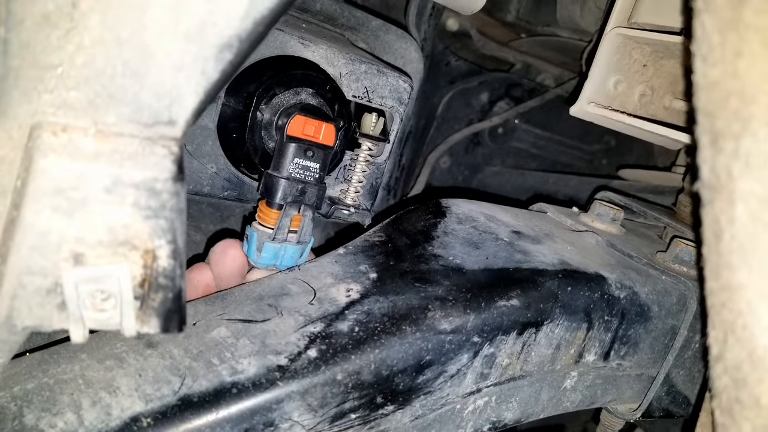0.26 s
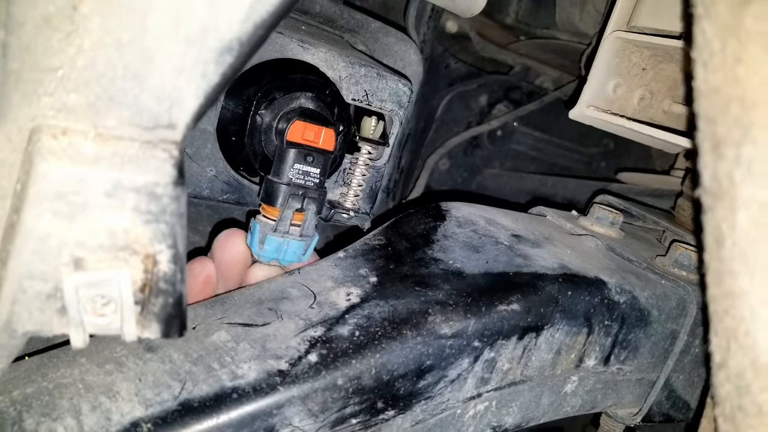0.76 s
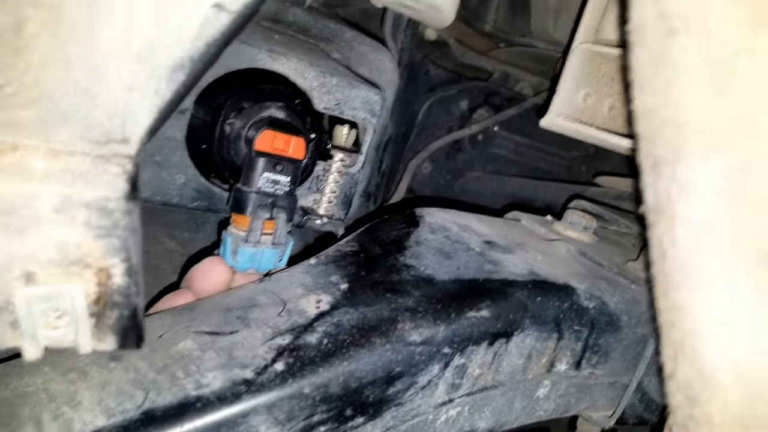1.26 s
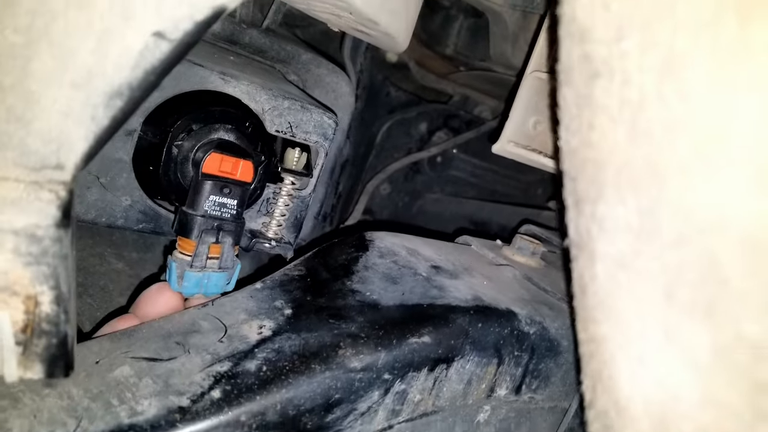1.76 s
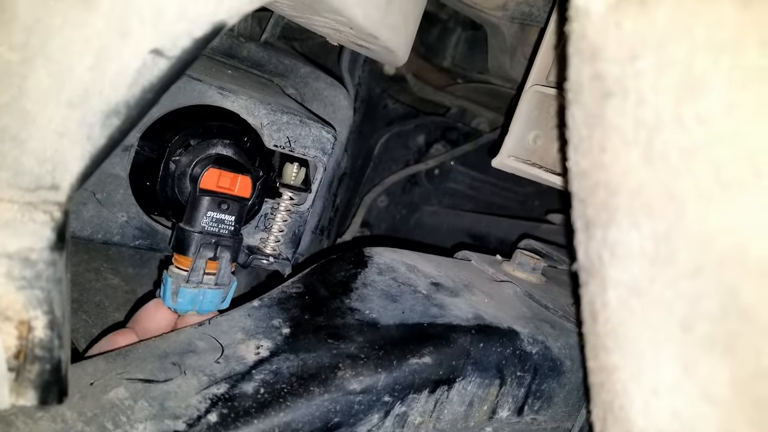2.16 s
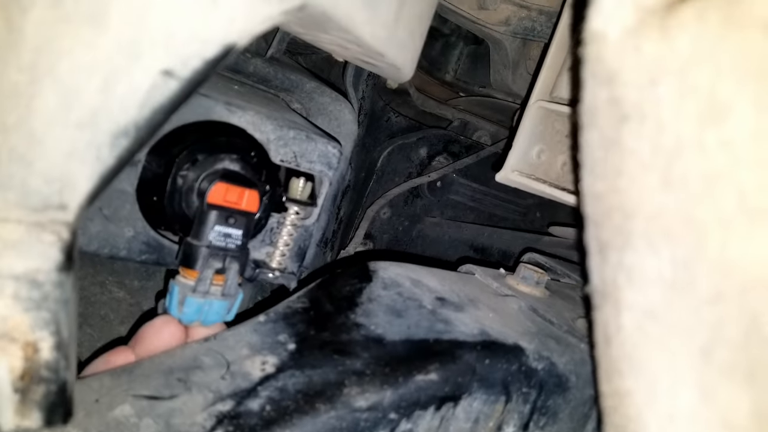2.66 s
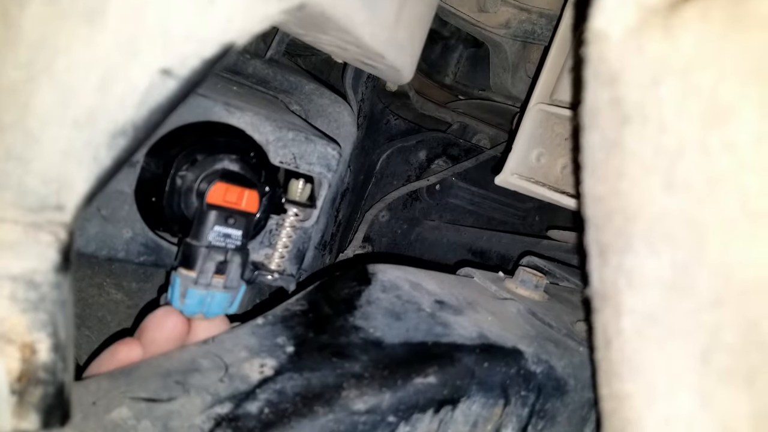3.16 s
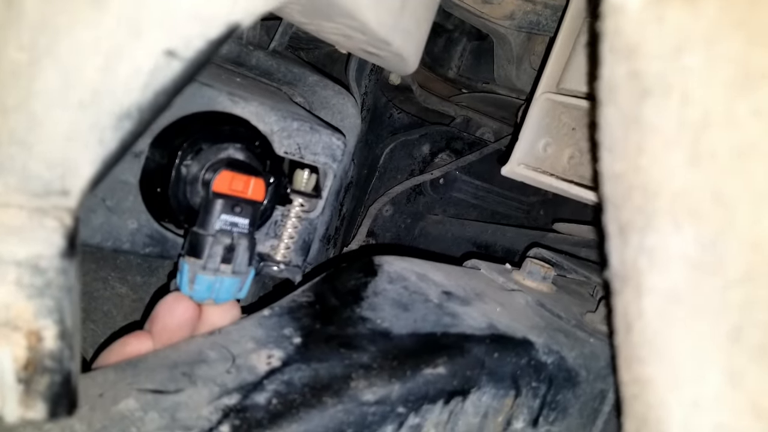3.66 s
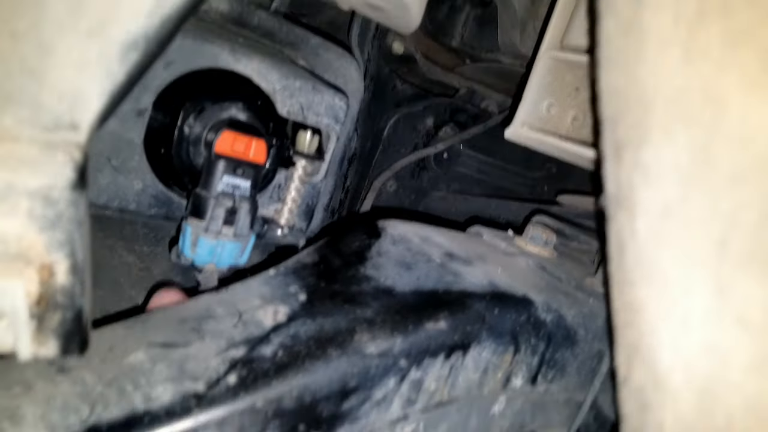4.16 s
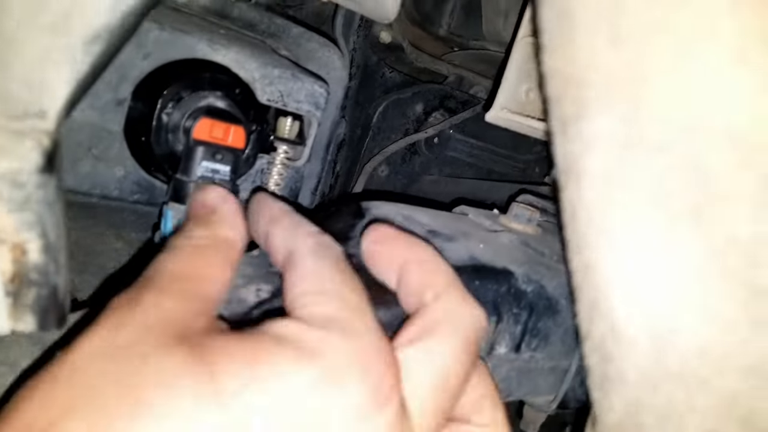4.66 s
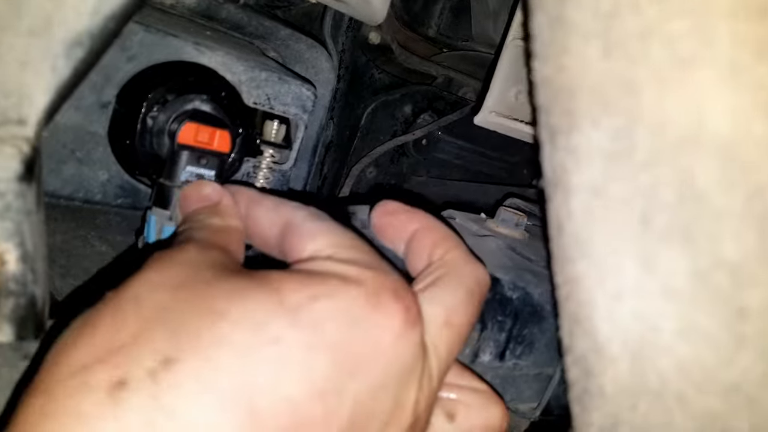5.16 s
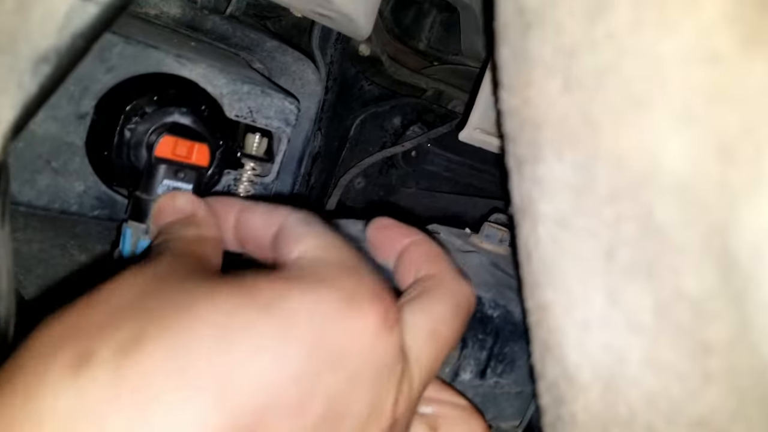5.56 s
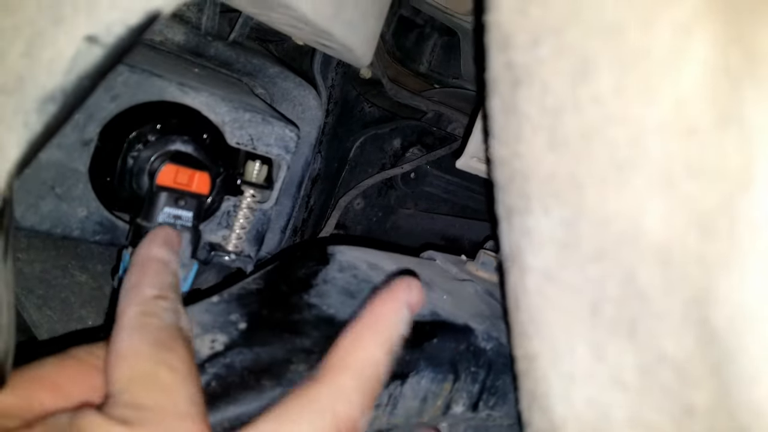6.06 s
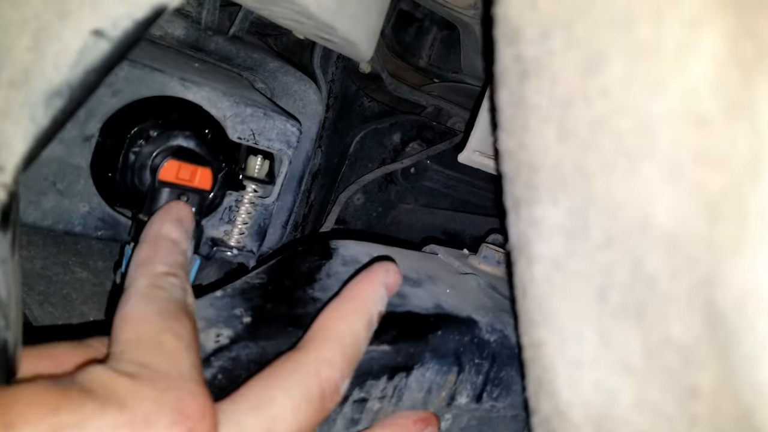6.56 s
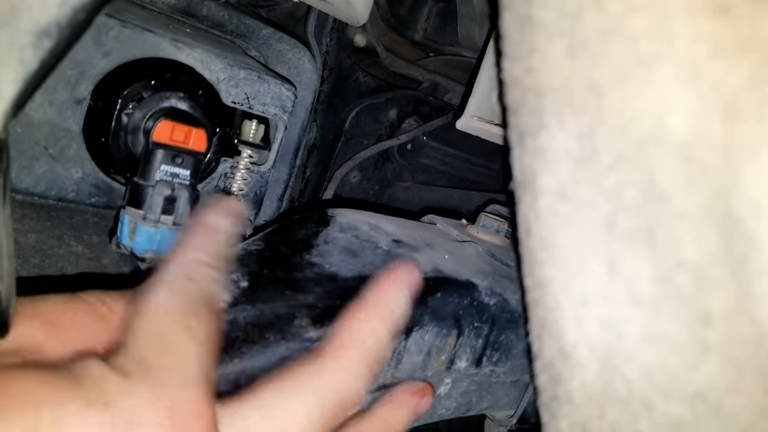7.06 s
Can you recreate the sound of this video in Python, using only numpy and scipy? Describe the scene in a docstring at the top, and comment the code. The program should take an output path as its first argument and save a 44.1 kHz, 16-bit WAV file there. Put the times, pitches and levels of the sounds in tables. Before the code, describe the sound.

Very close under a vehicle, a plastic plug clacks hard onto a hollow lamp almost at once, with a sharp latch snap, a panel thud and a thin spring ring. Light rubs and ticks follow, then a second drier double knock midway. Later, clicks, dull fingertip bumps on the right of the microphone, tiny squeaks and weaker knocks over low rumble and faint hiss.

```python
"""Under a vehicle, close to the microphone, a hand works a plastic wiring connector onto a lamp bulb.
Knocks ring damped modes of the hollow lamp, bracket and panel; hard snaps add noise cracks and a singing spring.
The latch ticks in noise bursts; sliding fingers and plug scrape and squeak by random slips through resonances.
A finger bumps the right microphone port with slow pressure pulses and brushes it with skin noise.
Underneath lie rumble and hiss of shaped noise, wavering sine hums and a thin whine from a narrow noise band."""
import sys
import numpy as np
from scipy import signal
from scipy.fft import rfft, irfft, next_fast_len
from scipy.io import wavfile
from scipy.ndimage import map_coordinates

SR = 44100
rng = np.random.default_rng(int(sys.argv[2]) if len(sys.argv) > 2 else 0)


def wrap_up_sound(samples):
    """Save the sound to the file named by the first command line argument, as 16-bit audio."""
    columns = np.atleast_2d(samples).T
    # keep every value between -1 and 1, then stretch to whole-number steps
    tamed = np.clip(columns, -1, 1)
    steps = np.round(tamed * 32767).astype(np.int16)
    wavfile.write(sys.argv[1], SR, steps)


N = 322371
T = np.arange(int(.7 * SR)) / SR  # time axis of one struck sound [s]
# All table levels are relative: part trims, panning and the port colour come on top.


# the plug strikes the lamp: (time [s], housing level [dB], bracket level [dB], panel level [dB])
PLUG_KNOCKS = [(0.466, -5, -30, -33), (.475, 1, -16.5, -15), (.4883, -19.5, -20.5, -12.5),
               (2.314, -26, -31.5, -39), (3.4932, 0, -36.5, -39), (3.502, -0.5, -24, -38),
               (5.053, -41.5, -39, -60), (5.067, -35, -38.5, -46), (5.367, -55, -64, -39),
               (5.645, -40.5, -52, -65), (6.206, -29, -49, -45.5), (6.271, -39, -60, -58),
               (6.7322, -20.5, -35, -36.5), (6.7399, -21.5, -29.5, -28.5), (6.8165, -40, -61, -32),
               (7.079, -41, -70, -66)]
# modes of the hollow lamp housing: (frequency [Hz], level [dB], t60 [s])
HOUSING_MODES = [(1194, -5, 0.035), (1371.5, 3, 0.032), (1481, -8, .04), (1579, -7, 0.053),
                 (1892, -12.5, 0.039), (2093, -13, 0.046), (2490, -26.5, 0.14), (3320, -29, 0.026),
                 (3940, -31.5, 0.027)]
# modes of the lamp bracket: (frequency [Hz], level [dB], t60 [s])
BRACKET_MODES = [(729, -12.5, .09), (852.8, -1.5, 0.12), (926, -8.5, 0.036), (1067, -8, 0.064)]
# modes of the body panel: (frequency [Hz], level [dB], t60 [s])
PANEL_MODES = [(121, -14.5, 0.13), (151.4, -6, 0.31), (240, -6.5, 0.2), (277, -9.5, 0.15),
               (321.4, 0.5, .17), (355.6, -6, 0.13), (455, -9.5, 0.081), (481, -6, 0.25), (590, -9, 0.088)]
# colour of the housing's dense noise: (frequency [Hz], level [dB])
CLACK_COLOUR = [(300, -26), (800, -18), (1350, 8), (2100, -9), (2800, -18.5), (4200, -17.5), (7000, -32),
                (9000, -46), (16000, -50)]
# colour of the panel's dense noise: (frequency [Hz], level [dB])
THUD_COLOUR = [(40, -26), (130, -6.5), (205, -11), (320, -2.5), (800, -11), (2000, -26), (6000, -55.5)]


def knocks():
    """Each blow rings the hollow housing, its bracket and the body panel."""
    housing, mount = np.zeros((2, N))
    for s, housing_db, bracket_db, panel_db in PLUG_KNOCKS + grips():
        clack = ring(HOUSING_MODES, attack=0.0017, scatter_db=1.5)
        clack = clack + amp(-20) * burst(CLACK_COLOUR, t60=0.096, attack=0.0012)
        bracket = ring(BRACKET_MODES, attack=0.00027, scatter_db=2)
        thud = amp(-1) * ring(PANEL_MODES, attack=.001, scatter_db=2)
        thud = thud + amp(-3) * burst(THUD_COLOUR, t60=.08, attack=0.00073)
        add(housing, s, amp(housing_db) * clack)
        add(mount, s, amp(bracket_db) * bracket + amp(panel_db) * softened(thud, panel_db))
    return placed(housing, left_db=-10.5, lag=0.00056) + placed(mount, left_db=-4.5, lag=0)


# a grip's knock over its stroke, then bracket and panel under the housing [dB]
GRIP_DB, GRIP_BRACKET_DB, GRIP_PANEL_DB = 18, -11, -14.5


def grips():
    """Each stroke starts with a light knock, in step with how hard it rubs the housing."""
    slope = PART_LEVELS[1][1]
    light = [(s, db + slope * bright_db + GRIP_DB) for s, half, db, bright_db in RUB_STROKES]
    return [(s, db, db + GRIP_BRACKET_DB, db + GRIP_PANEL_DB) for s, db in light]


SOFT_HZ, SOFT_GROWS = 1300, .3  # low-pass corner for a 0 dB blow [Hz], its power law with blow gain


def softened(x, db):
    """A weak blow stays in contact longer and thuds duller: a lower low-pass corner."""
    corner = np.clip(SOFT_HZ * amp(db) ** SOFT_GROWS, 60, 8000)
    return signal.sosfilt(signal.butter(2, corner, fs=SR, output="sos"), x)


# the latch snaps home:
# (time [s], crack level [dB], sizzle level [dB], spring level [dB], place struck along the spring [0-1])
LATCH_SNAPS = [(0.4657, -34.5, -34, -74, .45), (0.475, -14.5, -8.5, -39.5, 0.44),
               (3.4935, -25.5, -26, -61, .31), (3.4997, -26.5, -24, -43.5, 0.26)]
# colour of the latch letting go: (frequency [Hz], level [dB])
CRACK_COLOUR = [(900, -19.5), (1900, 1), (2600, 1.5), (3300, -0.5), (4500, -1.5), (7000, -13),
                (8500, -19.5), (11000, -18), (16000, -25)]
# colour of the brightest latch noise, in snaps and ticks: (frequency [Hz], level [dB])
SIZZLE_COLOUR = [(5000, -39.5), (9000, -20.5), (10500, -9.5), (12000, -1), (14000, -0.5), (15500, -1),
                 (16800, -27)]
# modes of the steel spring: (frequency [Hz], level [dB], t60 [s])
SPRING_MODES = [(1137, 5, .64), (1740, -11.5, 0.93), (2120, -14.5, 0.99), (2920, -11, 0.38),
                (3480, -26.5, 0.32), (4250, -19.5, 0.43)]
# each spring mode radiates its own way: (frequency [Hz], left minus right [dB])
SPRING_PAN_BANDS = [(1150, 3.5), (1750, 3), (2150, -13.5), (2850, -6.5), (3500, 5.5), (4250, -4)]


def snaps():
    """The stiff latch lets go with a crack and a short sizzle; the spring sings until the hand damps it."""
    latch, spring = np.zeros((2, N))
    damping = amp(-110 * np.maximum(T - .23, 0))  # 110 dB a second, from 0.23 s after the snap
    for s, crack_db, sizzle_db, spring_db, place in LATCH_SNAPS:
        crack = burst(CRACK_COLOUR, t60=0.031, attack=0.00052)
        sizzle = burst(SIZZLE_COLOUR, t60=0.014, attack=.0002)
        add(latch, s, amp(crack_db) * crack + amp(sizzle_db) * sizzle)
        modes = []
        for k, (hz, db, t60) in enumerate(SPRING_MODES):
            # a mode answers weakly when struck near one of its nodes
            answer = np.sin((k + 1) * np.pi * place) ** 2
            modes.append((hz, db + 10 * np.log10(answer + 1e-6), t60))
        add(spring, s, amp(spring_db) * damping * ring(modes, attack=.004, scatter_db=1))
    return placed(latch, left_db=-11.5, lag=0) + amp(-2.5) * panned_by_band(spring, SPRING_PAN_BANDS)


# the latch catches on its ribs: (time [s], sizzle level [dB], latch level [dB])
LATCH_TICKS = [(1.6868, -35, -49.5), (2.0234, -53, -50.5), (2.3143, -39.5, -37.5), (2.7279, -47, -55),
               (3.3388, -57, -58.5), (3.3892, -38.5, -36.5), (3.498, -41.5, -29.5), (4.1525, -42.5, -41),
               (4.1641, -34, -39.5), (4.2009, -38, -45), (4.2413, -38.5, -43), (5.067, -70, -57.5),
               (6.2008, -46.5, -59.5), (6.7336, -44, -49.5)]
# colour of the latch body's click: (frequency [Hz], level [dB])
LATCH_COLOUR = [(1500, -20.5), (3000, -11), (4200, -4.5), (6000, 2.5), (7500, 3.5), (9000, -12.5),
                (16000, -19.5)]


def ticks():
    """Small bright clicks of the latch: noise bursts drawn separately for each port."""
    out = np.zeros((2, N))
    for s, sizzle_db, latch_db in LATCH_TICKS:
        pair = []
        for port in out:
            sizzle = burst(SIZZLE_COLOUR, t60=.028, attack=0.00028)
            click = burst(LATCH_COLOUR, t60=0.041, attack=0.00035)
            pair.append(amp(sizzle_db) * sizzle + amp(latch_db) * click)
        add(out, s, np.array(pair))
    return panned(out, pan_db=-5)


# how a stroke sounds the body, housing, shell and skin, one row each:
# (level [dB], level slope [dB per dB of brightness])
PART_LEVELS = [(6.5, -1.03), (4, -0.48), (1, 0.5), (3.5, 1.93)]
# the hand leans on the plug and is never quite still: (time [s], rustle level [dB])
HAND_HOLD = [(0, -94), (.6, -82), (1.3, -79), (1.8, -89.5), (3.9, -92.5), (4.3, -81.5), (5.4, -89.5),
             (6.5, -89.5), (6.9, -76), (7.31, -76)]
# low resonances of the rubbed body: (frequency [Hz], level [dB], t60 [s])
BODY_MODES = [(338, -3.5, 0.078), (470, -4.5, 0.065), (608, -1.5, 0.037), (700, -5, 0.046),
              (840, -2.5, 0.025)]
# resonances of the thin plug shell: (frequency [Hz], level [dB], t60 [s])
SHELL_MODES = [(2293, -8, .04), (2650, -7.5, 0.017), (3140, 0, 0.0064), (3770, -2.5, 0.009),
               (4213, -5, 0.018), (4950, -3, 0.0059), (6600, 3.5, 0.0039)]
# colour of sliding skin: (frequency [Hz], level [dB])
SKIN_COLOUR = [(3000, -21), (6500, 0), (8500, -16), (11000, -3), (13500, 1), (15600, 0.5), (16300, -27)]


def rubbing():
    """Each slide swells and fades, sounding the body, the housing, the thin plug shell and the skin."""
    part_db, slope = np.transpose(PART_LEVELS)
    contacts = slides()
    strengths = np.array([amp(db + slope * bright_db) for s, half, db, bright_db in contacts])
    shapes = np.array([swell(s, half) for s, half, db, bright_db in contacts])
    rustle = amp(curves(HAND_HOLD)[0])
    # overlapping slides and the rustle add as powers
    gains = np.sqrt(strengths.T ** 2 @ shapes ** 2 + rustle ** 2)
    body, housing, rasp, fizz = amp(part_db)[:, None] * gains
    low = body * panned(rubbed(BODY_MODES), pan_db=-3.5)
    low = low + housing * panned(rubbed(HOUSING_MODES), pan_db=-9.5)
    high = rasp * panned(rubbed(SHELL_MODES), pan_db=-6.5)
    high = high + fizz * panned(coloured(slips(), SKIN_COLOUR), pan_db=-4)
    return low + high


# fingers and plug slide, brighter with skin, duller with plastic:
# (time of the first grip [s], half length [s], level [dB], brightness [dB])
RUB_STROKES = [(.05, 0.064, -78.5, -6), (0.399, 0.046, -79.5, -10), (0.798, .035, -65, 1.5),
               (0.928, 0.04, -66, 1), (1.04, 0.084, -69, -3), (1.188, 0.084, -72, -6),
               (1.683, 0.027, -69, -7.5), (1.987, .06, -72, -4), (2.721, 0.06, -66.5, -8),
               (3.345, 0.053, -67.5, 1), (3.782, 0.019, -72, -0.5), (4.157, .042, -57, -2),
               (4.218, 0.063, -66, 4), (4.745, 0.12, -81.5, -15.5), (5.151, 0.031, -70, -3.5),
               (5.665, 0.052, -73.5, 3), (5.873, 0.12, -66.5, 1), (6.658, .04, -70.5, -0.5),
               (7.115, 0.08, -62, 1)]
GRIP_LEAD = .4  # a stroke peaks this share of its half length after the grip
SKID_S, SKID_HALF_S, SKID_BRIGHT_DB = 0.046, 0.045, -4.5  # delay to the peak, half length, brightness
SKID_DB, SKID_MAX_DB = -41.5, -66.5  # the skid under its knock; friction caps its level


def slides():
    """Sliding contacts (peak time, half length, level, brightness): strokes, and a skid after each knock."""
    strokes = [(s + GRIP_LEAD * half, half, db, bright_db) for s, half, db, bright_db in RUB_STROKES]
    skids = []
    for s, housing_db, *rest in PLUG_KNOCKS:
        skid_db = min(housing_db + SKID_DB, SKID_MAX_DB)
        skids.append((s + SKID_S, SKID_HALF_S, skid_db, SKID_BRIGHT_DB))
    return strokes + skids


def slips():
    """Sliding friction at each port: countless tiny slips of uneven size, coming in clumps."""
    return rng.standard_normal((2, N)) * amp(2.4 * wobble(800) + 3 * wobble(70))


def rubbed(modes):
    """Slips played through an object's resonances, at rms 1."""
    resonance = ring(modes, attack=.0001, scatter_db=2)
    return unit(signal.fftconvolve(slips(), resonance[None], axes=1)[:, :N])


# a fingertip sticks and squeaks on the shell: (time of the peak [s], half length [s], level [dB])
FINGER_SQUEAKS = [(4.802, 0.021, -55.5), (5.895, 0.024, -50)]
# ringing resonances of the squeak: (frequency [Hz], level [dB], t60 [s])
SQUEAK_MODES = [(2313, 5, 0.068), (2730, -12, 0.05), (3810, -3, 0.026), (4260, 1.5, 0.041)]


def squeaks():
    """Sticking skin rasps on the shell and sets its sharpest resonances singing."""
    sound = rubbed(SQUEAK_MODES) + amp(-2) * rubbed(SHELL_MODES)
    gain = sum(amp(db) * swell(s, half) for s, half, db in FINGER_SQUEAKS)
    return gain * panned(unit(sound), pan_db=-5.5)


# the cavity's decay: (frequency [Hz], t60 [s])
WHEEL_WELL_DECAY = [(150, .19), (800, 0.24), (1500, 0.091), (4000, 0.074), (14000, .08)]


def wheel_well(x):
    """The cavity's short answer: a noise tail decaying by band, longest in the low mids, short above."""
    hz, t, z = signal.stft(rng.standard_normal((2, SR // 2)), SR, nperseg=256)
    decay = amp(-60 * t / along(WHEEL_WELL_DECAY, hz)[:, None])
    tail = signal.istft(z * decay, SR, nperseg=256)[1]
    return signal.fftconvolve(x, tail / np.linalg.norm(tail[0]), axes=1)[:, :N]


# a finger bumps the right port: (time [s], level [dB], contact time to the pressure peak [s])
PORT_BUMPS = [(4.5020, -8, .0007), (4.507, -8, 0.0022), (4.5419, -16, 0.00044), (4.643, -24, 0.0013)]


def bumps():
    """A fingertip pushes air into the port; the pressure leaks away and undershoots."""
    out = np.zeros(N)
    for s, db, contact in PORT_BUMPS:
        u = T / contact
        add(out, s, amp(db) * u ** 2 * np.exp(2 * (1 - u)))
    leak = signal.butter(3, 50, "high", fs=SR, output="sos")
    return signal.sosfilt(leak, out) * amp([[-26], [2]])  # left, right


# half length [s], level for a 0 dB bump [dB], growth [dB per dB of bump]
BRUSH_HALF_S, BRUSH_DB, BRUSH_GROWS = 0.014, -62.5, 0.11
# the fingertip judders as it lands: delay [s], half length [s], level under the bump [dB]
GRIT_DELAY_S, GRIT_HALF_S, GRIT_DB = 0.0042, 0.0086, -34


def brushes():
    """Every bump drags a little skin across the right port: a gritty judder and a soft hiss."""
    grit, brush = np.zeros((2, N))
    for s, db, contact in PORT_BUMPS:
        grit += amp(db + GRIT_DB) * swell(s + GRIT_DELAY_S, GRIT_HALF_S)
        brush += amp(BRUSH_DB + BRUSH_GROWS * db) * swell(s, BRUSH_HALF_S)
    judder = grit * rubbed(BODY_MODES)
    skin = rubbed(SHELL_MODES) + amp(2.5) * coloured(slips(), SKIN_COLOUR)
    return panned(judder, pan_db=-21.5) + brush * panned(skin, pan_db=-13)


# faint low hums, like distant motors:
# (time at the loudest [s], half length [s], mean frequency [Hz], mean level [dB])
LOW_HUMS = [(0.802, 1.17, 220, -62), (2.918, .42, 199, -53.5), (5.202, 0.94, 156, -55.5)]


def drone():
    """Sine hums that swell and fade, wavering in pitch and level."""
    out = np.zeros(N)
    for s, half, hz, db in LOW_HUMS:
        level = amp(db + 2.5 * wobble(6)) * swell(s, half)
        phase = 2 * np.pi * np.cumsum(hz + 0.4 * wobble(7)) / SR
        out += level * np.sin(phase)
    return out


# colour of the garage rumble: (frequency [Hz], level [dB])
RUMBLE_COLOUR = [(18, -42), (30, -11.5), (55, 2), (120, 0), (200, -4.5), (290, -11), (400, -22.5),
                 (700, -37.5), (1000, -38.5), (1350, -41), (2000, -47), (5000, -54.5), (9000, -66.5)]
# how the rumble rises and falls: (time [s], level [dB])
RUMBLE_LEVEL = [(0.0, -49), (0.47, -49), (0.85, -52.5), (2.42, -56.5), (3.18, -50), (3.58, -54), (6.6, -54),
                (7.31, -51)]
# colour of the microphone's whine, a narrow band: (frequency [Hz], level [dB])
WHINE_COLOUR = [(5600, -42.5), (6400, -12), (6950, 0), (7250, 1.5), (7500, -13), (7900, -39.5)]
# colour of the microphone's hiss: (frequency [Hz], level [dB])
HISS_COLOUR = [(7000, -36.5), (10000, -13.5), (12500, -1), (15500, 3), (16200, -24.5)]


def background():
    """Low garage rumble, nearly alike in both ports, and hums under the microphone's whine and hiss."""
    noise = lambda: rng.standard_normal((2, N))
    shared = rng.standard_normal(N)
    rumble = coloured(shared + 0.12 * noise(), RUMBLE_COLOUR) * amp(curves(RUMBLE_LEVEL)[0] + 1.5)
    whine = amp(-70.5) * coloured(noise(), WHINE_COLOUR)
    hiss = amp(-78 + 1.2 * wobble(2.6)) * panned(coloured(noise(), HISS_COLOUR), pan_db=-4.5)
    return panned(rumble + drone(), pan_db=-3) + whine + hiss


def ring(modes, attack, scatter_db):
    """Damped modes at slightly new strengths, neighbours starting in opposite directions; attack in s."""
    hz, db, t60 = np.transpose(modes)[:, :, None]
    strength = db + scatter_db * rng.standard_normal(db.shape)
    sign = (-1) ** np.arange(len(modes))[:, None]
    waves = sign * amp(strength - 60 * T / t60) * np.sin(2 * np.pi * hz * T)
    return waves.sum(axis=0) * (1 - np.exp(-T / attack)) / np.linalg.norm(amp(db))


def burst(spectrum, t60, attack):
    """Countless dense modes dying together, as decaying noise; t60 and attack in s."""
    noise = coloured(rng.standard_normal(len(T)), spectrum)
    return noise * amp(-60 * T / t60) * (1 - np.exp(-T / attack))


def swell(s, half):
    """A gain that rises to 1 at time s and falls again, down to 1/e at half seconds either side."""
    return np.exp(-np.minimum(np.abs((np.arange(N) / SR - s) / half), 8) ** 1.8)


def wobble(rate):
    """A smooth random curve with rate knots a second."""
    return map_coordinates(rng.standard_normal(int(N * rate / SR) + 4), [np.arange(N) * rate / SR])


def placed(x, left_db, lag):
    """The lamp is nearer the right port; the left hears it weaker and lag seconds later."""
    n = np.arange(N)
    return np.array([amp(left_db) * np.interp(n - lag * SR, n, x), x])


def panned(x, pan_db):
    """Set the left-minus-right level difference."""
    return x * amp([[pan_db / 2], [-pan_db / 2]])


def panned_by_band(x, points):
    """Set a left-minus-right level difference that changes with frequency."""
    return filtered(x, lambda hz: amp(np.outer([.5, -.5], along(points, hz))))


def coloured(x, spectrum):
    """x with the given spectrum, at rms 1."""
    return unit(filtered(x, lambda hz: amp(along(spectrum, hz))))


def filtered(x, response):
    """x through a response given as a function of frequency."""
    n = x.shape[-1]
    m = next_fast_len(n + 4096)
    return irfft(rfft(x, m) * response(np.fft.rfftfreq(m, 1 / SR)), m)[..., :n]


def along(points, hz):
    """Read (frequency [Hz], value) points on a log axis."""
    f, v = np.transpose(points)
    return np.interp(np.log(hz + 1), np.log(f), v)


def curves(rows):
    """One value per sample for each column after the time."""
    s, *cols = np.transpose(rows)
    return [np.interp(np.arange(N) / SR, s, c) for c in cols]


def add(track, s, x):
    """Mix x into the track at time s."""
    start = max(round(s * SR), 0)
    track[..., start:start + x.shape[-1]] += x[..., :N - start]


def amp(db):
    """Decibels to gain."""
    return 10 ** (np.asarray(db) / 20)


def unit(x):
    """Scale to rms 1."""
    return x / np.sqrt(np.mean(x ** 2) + 1e-20)


# the two ports colour near sounds differently: (frequency [Hz], left minus right [dB])
PORT_COLOUR = [(1500, 0.5), (4000, 1.5), (7000, 7.5), (10000, -1), (14000, -2.5)]


def scene():
    """The handling sounds in their cavity, over the background."""
    plug = knocks() + snaps() + ticks()
    handling = plug + amp(-13.5) * wheel_well(plug) + rubbing() + squeaks()
    return panned_by_band(handling, PORT_COLOUR) + bumps() + brushes() + background()


TOP_HZ = 16500  # band limit


def record(dry):
    """The microphone sheds the deepest bass, rounds peaks off near full scale and cuts at the band limit."""
    lean = signal.sosfilt(signal.butter(3, 36, "high", fs=SR, output="sos"), dry)
    limited = lean / (1 + np.abs(lean / .9) ** 8) ** (1 / 8)
    return filtered(limited, lambda hz: hz < TOP_HZ)


dry = scene()
out = record(dry)
wrap_up_sound(out)
```